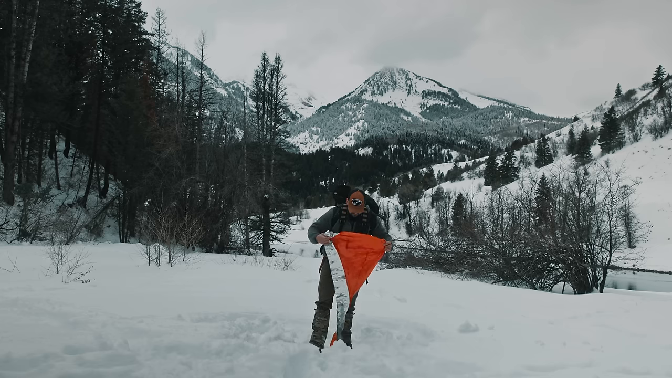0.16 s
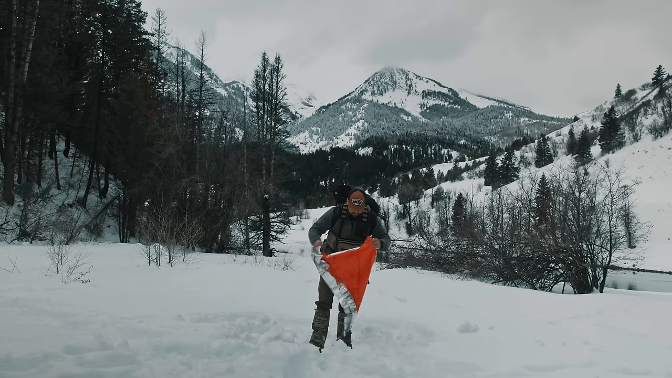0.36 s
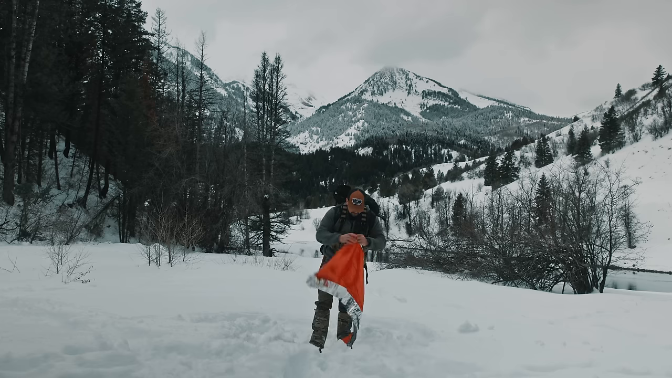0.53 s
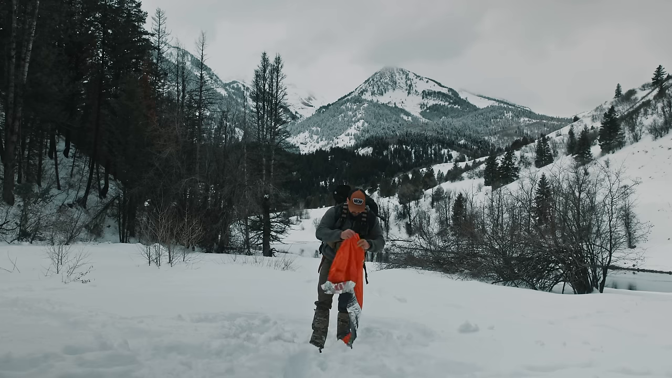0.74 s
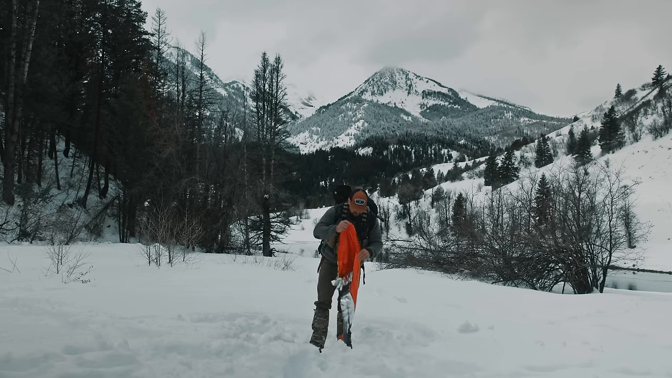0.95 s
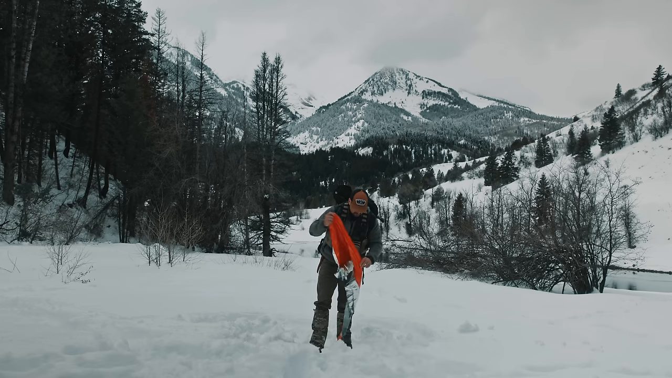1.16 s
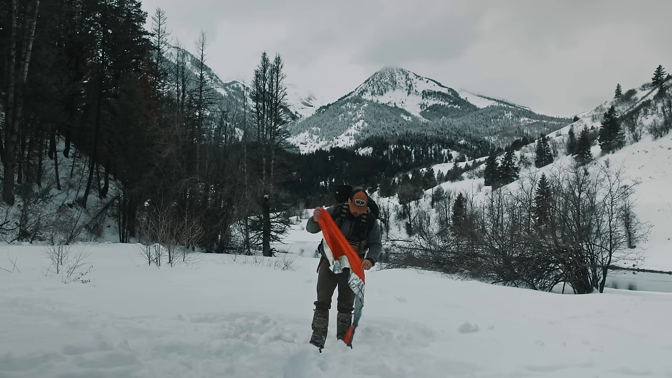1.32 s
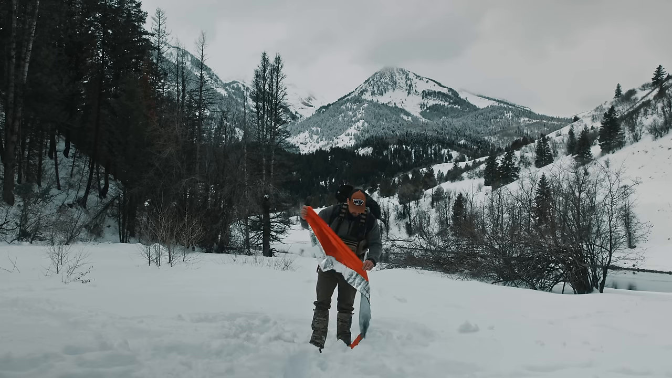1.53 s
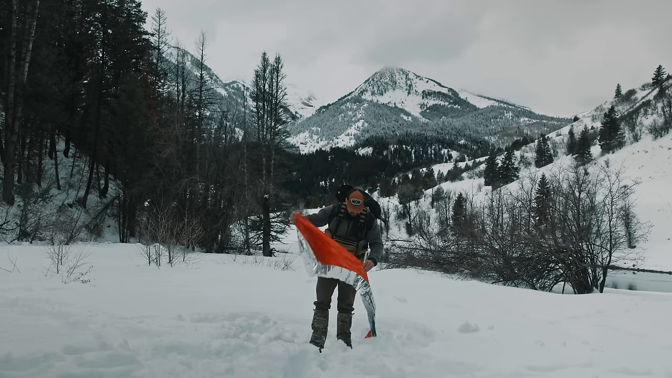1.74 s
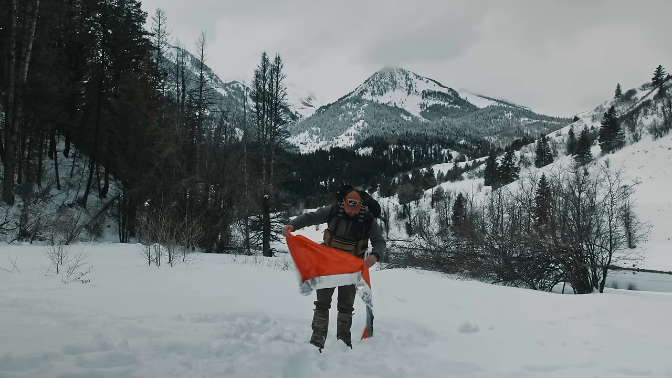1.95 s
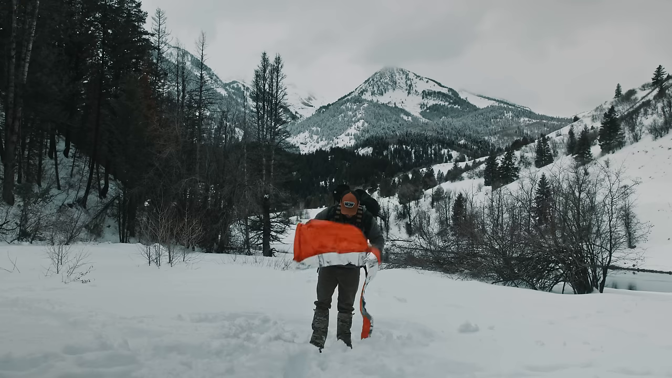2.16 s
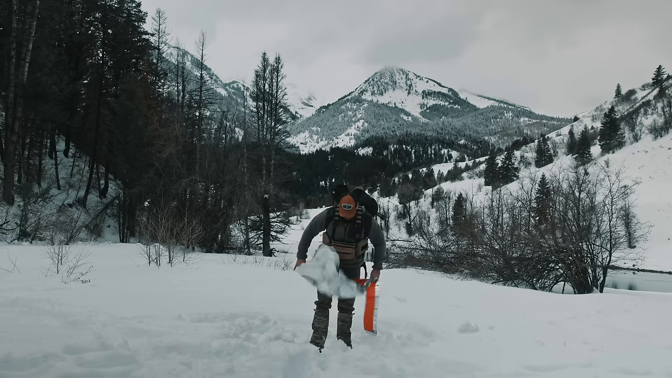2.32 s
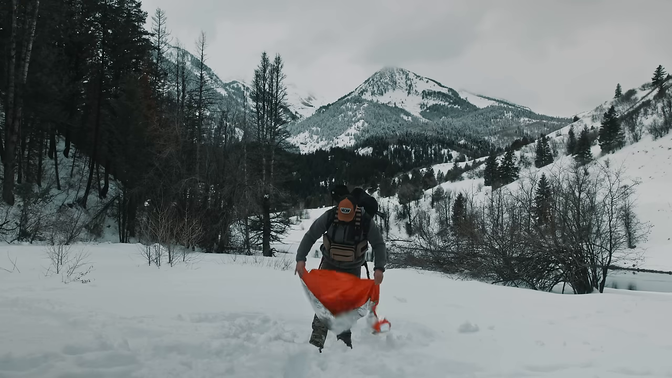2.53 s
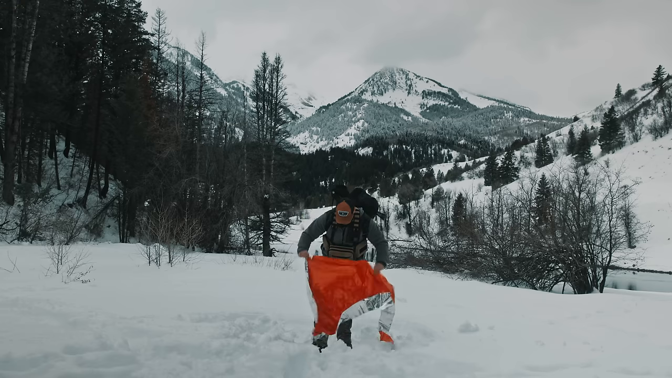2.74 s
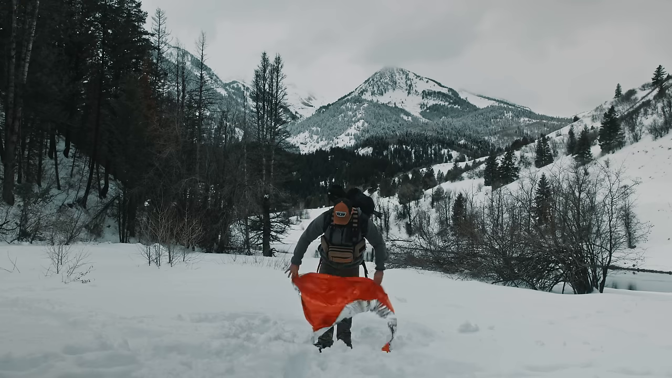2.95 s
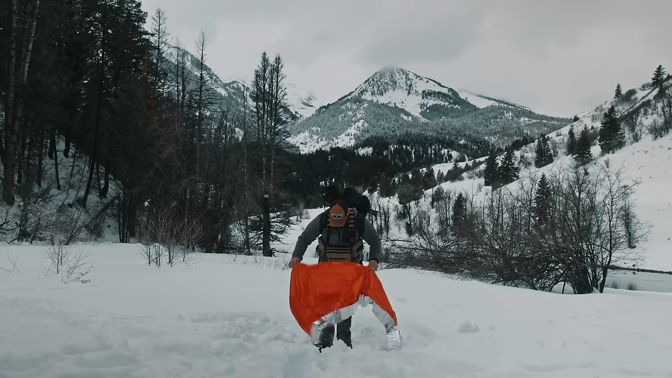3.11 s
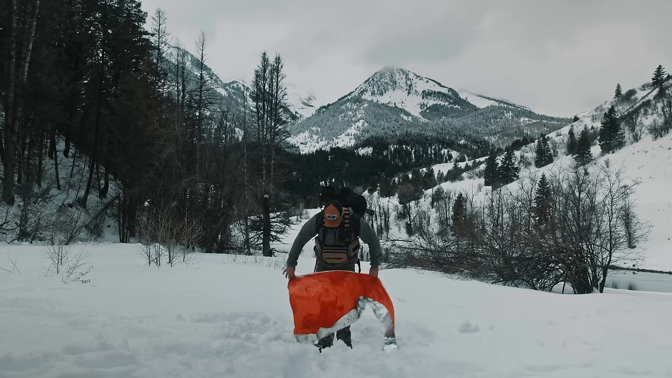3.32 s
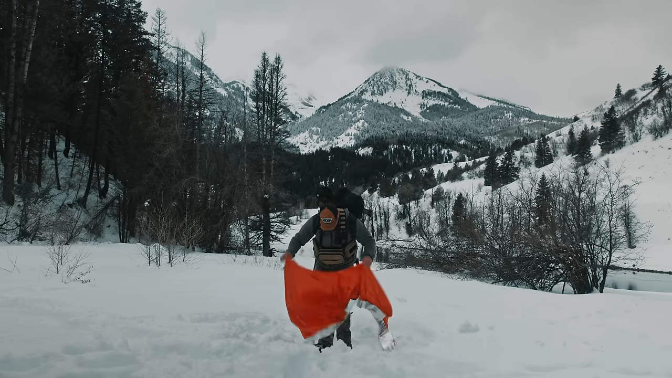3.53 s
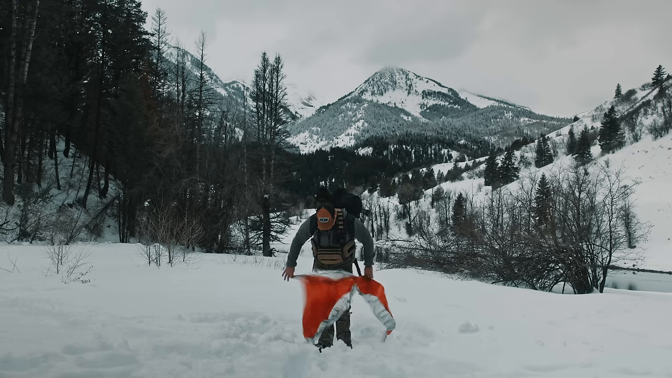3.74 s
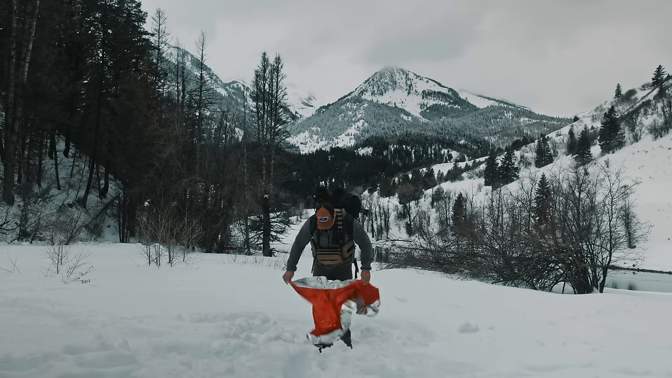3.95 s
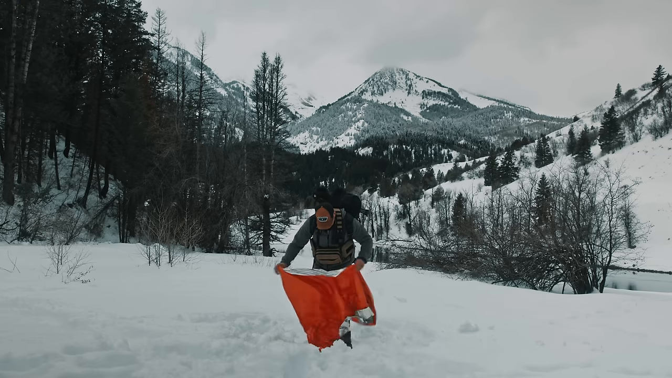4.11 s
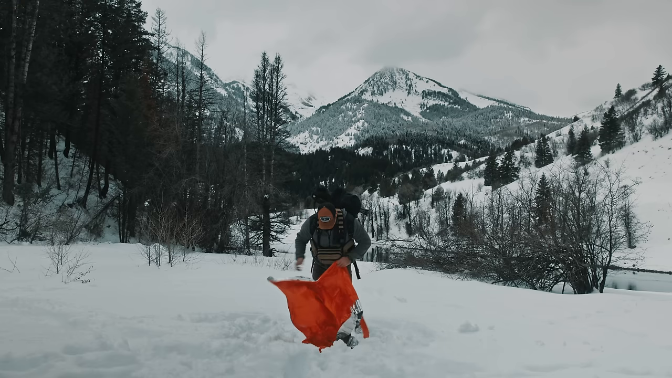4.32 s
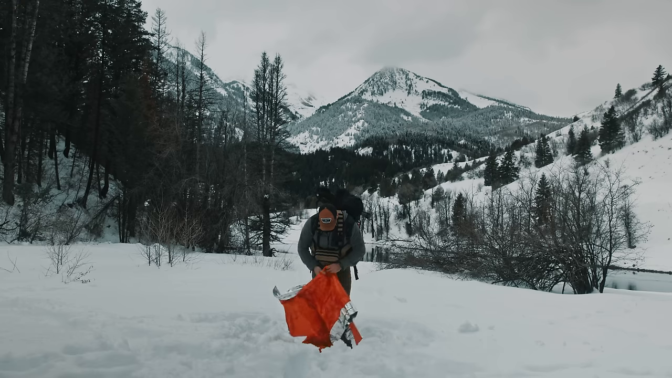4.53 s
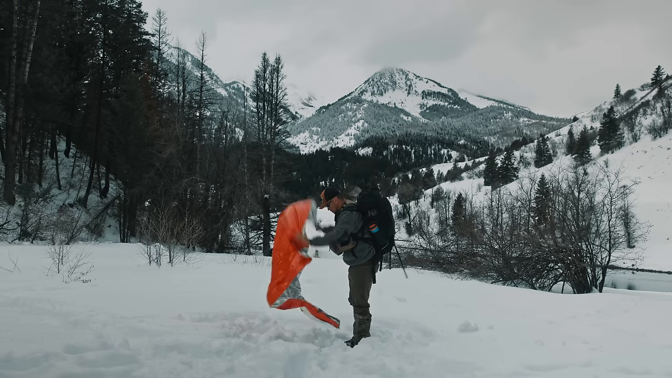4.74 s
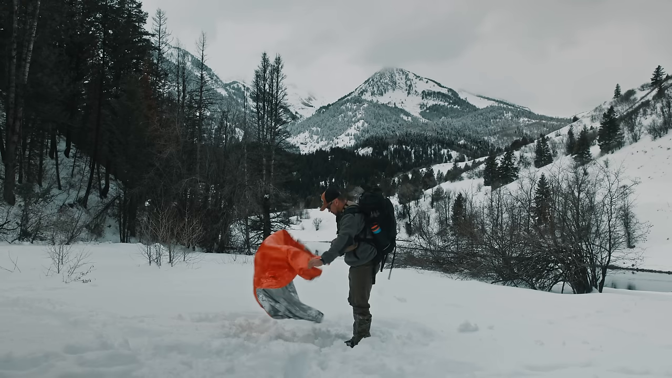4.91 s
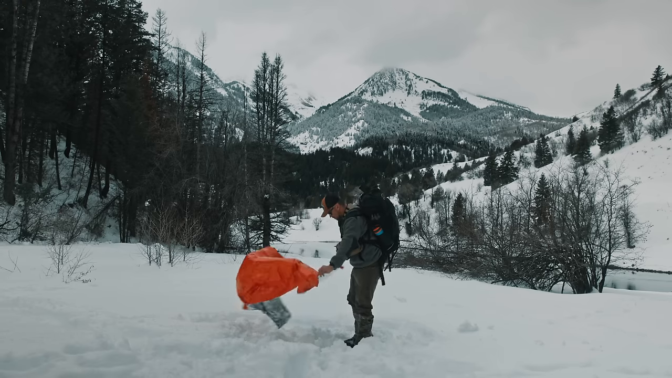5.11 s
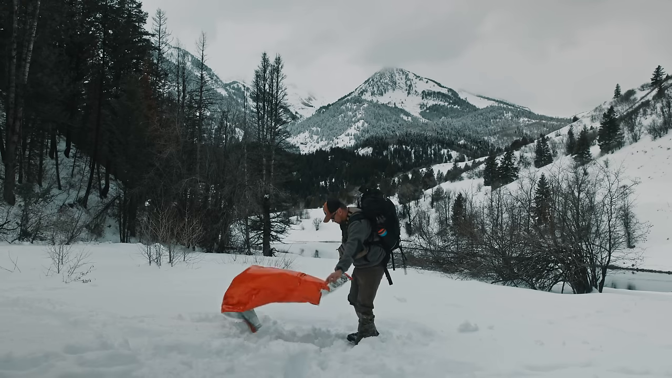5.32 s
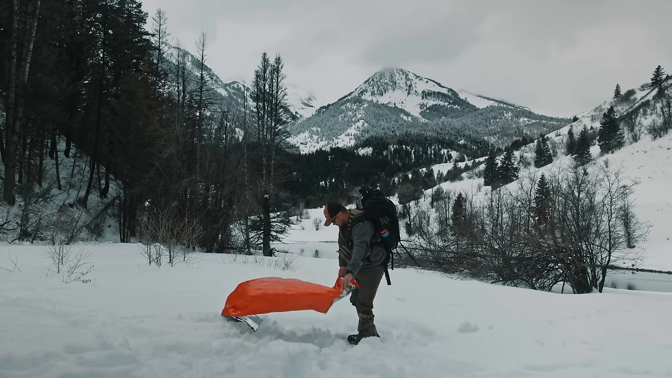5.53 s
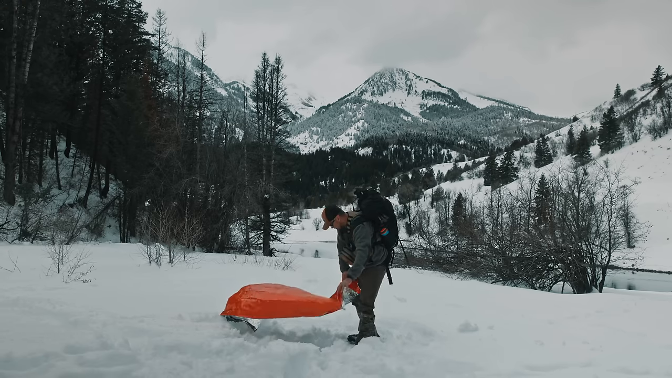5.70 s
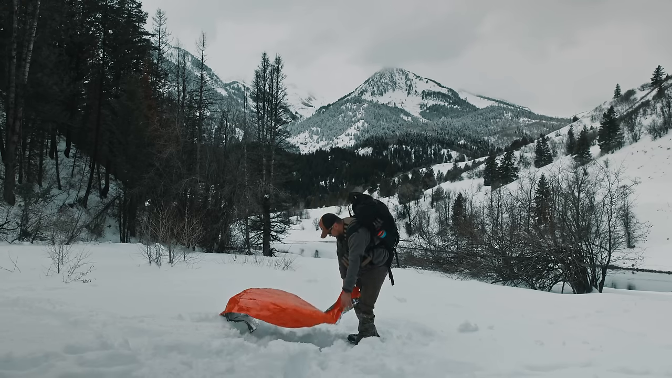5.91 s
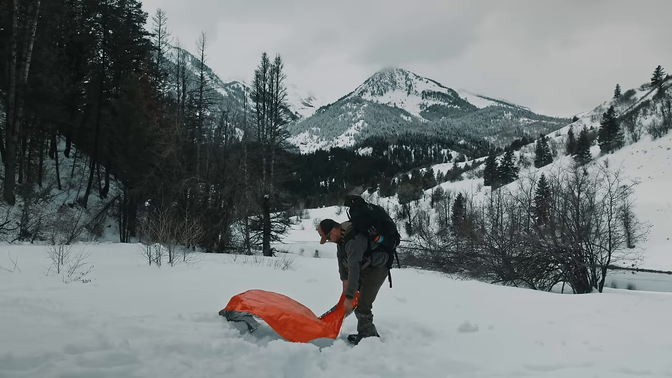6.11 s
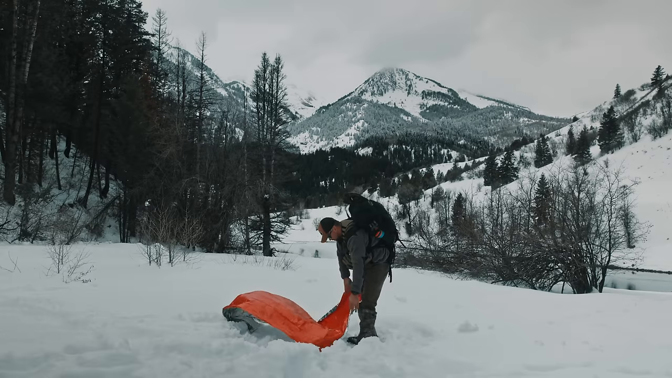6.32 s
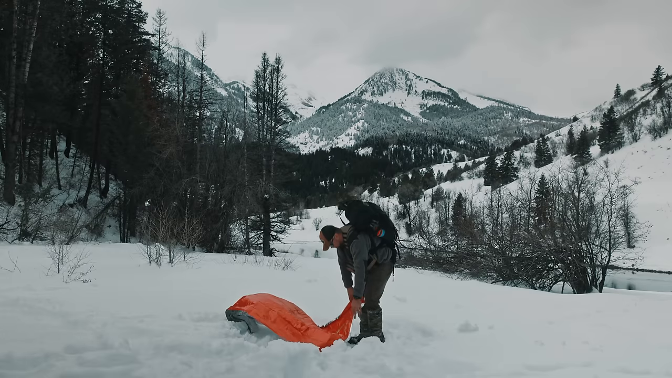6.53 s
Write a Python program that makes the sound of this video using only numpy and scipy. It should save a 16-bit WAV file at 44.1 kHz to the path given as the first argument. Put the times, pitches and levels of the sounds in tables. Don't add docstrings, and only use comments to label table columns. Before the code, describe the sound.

Close up in open, snow-muffled air, a thin stiff plastic sheet is tugged open with bright, dense crackling and single sharp creases popping. A brief lull of faint rustle follows, then hard shakes snap loudly with low whumps of pushed air, irregularly spaced. Finally the sheet slaps the snow lightly and settles with soft crinkles and dull pats. Dry, nearly echo-free, with only a very faint air hush behind.

```python
import sys
import numpy as np
from scipy import signal
from scipy.fft import rfft, irfft
from scipy.io import wavfile
from scipy.ndimage import uniform_filter1d

SR = 44100
rng = np.random.default_rng(int(sys.argv[2]) if len(sys.argv) > 2 else 0)


def store_pcm(level_fs):
    pcm = np.round(np.clip(level_fs, -1, 1) * 32767).astype(np.int16)
    wavfile.write(sys.argv[1], SR, np.atleast_2d(pcm).T)


def magnitude_from_level(level_db):
    exponent = np.asarray(level_db, float) / 20
    return 10 ** exponent


N = 289296

# start_s, effort_db, crease_fineness_db, slack_db
HANDLING = [(0, -47, 0, 4.5), (.14, -38, -6, -12), (.3, -40.5, -2.5, -9), (.61, -39.5, -9, -2),
            (.8, -35.5, -7.5, 2), (1.06, -33, -7, -6), (1.4, -46.5, 5, -2.5), (1.8, -45, -2.5, -7),
            (2.02, -47.5, -2.5, -6), (2.3, -32, -5.5, 4.5), (2.8, -36.5, -6, -5), (3.25, -36, -5, -6.5),
            (3.6, -27.5, -8, -1.5), (4.02, -37, -6, -3), (4.78, -34, -5, -3.5), (5.8, -46, -7.5, -2),
            (5.92, -43.5, -8.5, -0.5), (6.56, -44.5, -6.5, 2)]
# full_s, hold_s, effort_db, slack_db, suddenness (>1 jerks
TUGS = [(.14, 0.043, -36.5, -3, 1.3), (.225, 0.017, -36.5, -12, 0.78), (.335, .005, -39, -16, 1.2),
        (0.374, 0.0087, -24, -1, 0.74), (.46, 0.09, -37, -3.5, 0.73), (.675, .01, -25.5, -2, 0.97),
        (.718, 0.022, -27.5, -5.5, 1.9), (0.818, .005, -37, -3, 1), (0.89, 0.0044, -29.5, -9, 1.6),
        (0.967, 0.091, -31.5, -7, 1.4), (1.5, .1, -50.5, -18, 1.4), (1.826, 0.038, -45, -4, 1.7),
        (2.078, 0.019, -29.5, -5.5, 0.72), (2.18, 0.028, -32.5, -19, 0.44),
        (2.29, 0.0066, -14, -5, 1.05), (2.341, 0.058, -18, -7, 0.9), (2.872, 0.012, -29.5, -23, 0.64),
          (2.925, 0.0053, -15, -5.5, 1.13), (2.99, .01, -33, -4, 2.5), (3.1, 0.014, -37.5, 2, 1.4),
          (3.183, 0.017, -34.5, -0.5, 0.33), (3.391, 0.0058, -17.5, 1, 1.02),
          (3.676, 0.0082, -39, -1, 0.41), (3.799, .005, -15, -6, 0.86), (3.852, 0.028, -19.5, 3, 1.08),
          (4.074, .005, -33.5, 0, 1.1), (4.13, .03, -34.5, 0.5, 0.84), (4.255, .003, -31.5, -18, 1.7),
          (4.406, 0.0046, -29.5, -2, 1), (4.805, 0.035, -23.5, -1, 1.9), (4.844, 0.024, -19.5, -8.5, 3.55),
          (5.004, 0.0084, -25.5, 0, 1.33), (5.168, .005, -36, 0.5, 0.57), (5.403, 0.012, -36, -15, 1.6),
          (5.454, 0.044, -36, -12, 3.3), (5.86, .005, -56, -6, 2.2), (6.094, 0.031, -45.5, -6, 1),
          (6.342, .04, -54, 15, 4.3)]
# middle_s, half_width_s, dip_db
LULLS = [
    (.62, 0.011, -4.5),
    (1.8, 0.027, -5.5),
    (1.94, 0.019, -4.5),
    (2.135, 0.0085, -2),
    (3.72, 0.024, -2),
    (4.285, 0.0072, -6),
    (5.37, 0.026, -2),
    (5.79, 0.072, -4),
    (6.25, 0.069, -1.5),
    (6.43, 0.026, -2),
]
# start_s, rubbing_db
SLIDING = [(0, 5), (.4, 3.5), (.8, 10), (.95, 11), (1.35, 5), (1.7, 9), (1.8, 2), (2.45, -2), (2.85, 1),
           (3.05, -6.5), (4.3, -1), (4.85, 7), (5.6, 3), (5.8, 3), (5.95, 5), (6.4, -2)]
# start_s, pitch_hz, share
STRETCH = [(0, 3100, 0.4), (1.2, 3320, 0.06), (1.28, 6540, 0.8), (1.45, 7200, 0), (1.6, 3260, 0.22),
           (3.0, 3040, 0.1), (3.35, 1040, 0.08), (4.1, 960, 0.28), (4.4, 3020, 0), (5.8, 3100, 0.2),
           (5.9, 4540, 0.3), (6.17, 4500, 0.4), (6.25, 1000, 0.8), (6.56, 800, 1.6)]
# freq_hz, density_db
FILM = [(500, -16), (800, -11.5), (1300, -10), (1800, -10), (2850, -7.5), (3900, -10), (7300, -10.5),
        (10000, -16.5), (15600, -33), (20000, -47)]
# freq_hz, density_db
AIR = [(15, 10.5), (30, -46), (75, -0.5), (200, -2.5), (350, -2.5), (550, -6), (900, -20.5), (2000, -38.5)]
# centre_s, peak_db, pitch_hz
HEAVES = [
    (0.391, -27, 61),
    (0.999, -31, 61),
    (2.35, -12, 78),
    (2.94, -24, 60.3),
    (3.918, -17, 68.5),
    (5.21, -32, 50.4),
    (6.413, -31, 70),
]
# centre_s, peak_db, pitch_hz
FLAPS = [(0.1607, -27, 320), (0.3642, -27, 201), (0.384, -12, 306), (0.6736, -17, 268),
         (0.7174, -13.5, 397), (0.769, -24, 130), (0.893, -20, 235), (1.0743, -31, 190), (1.134, -27, 170),
         (2.0865, -23.5, 216), (2.332, -7, 110), (2.4073, -23, 260), (2.9275, -8.5, 202),
         (2.955, -11.5, 354), (2.977, -20, 272), (3.095, -16.5, 214), (3.3934, -42, 246), (3.414, -18, 250),
         (3.5574, -16, 270), (3.606, -21, 202), (3.6773, -14, 313), (3.8048, -4.5, 290),
         (3.8275, -8.5, 137), (3.8882, -36, 223), (4.085, -23, 262), (4.3959, -19.5, 240),
         (4.8213, -15, 390), (4.8338, -28, 250), (5.008, -20, 210), (5.4764, -27.5, 259)]
# centre_s, peak_db, pitch_hz
LANDINGS = [
    (5.1767, -13, 233),
    (5.5334, -25.5, 212),
    (5.8435, -32, 89.5),
    (5.936, -25.5, 110),
    (6.349, -17, 186),
    (6.368, -20.5, 130),
    (6.3865, -28, 130),
    (6.531, -26, 310),
]
# centre_s, peak_db, facet_hz
BIG_CREASES = [(.028, -19, 5300), (.0628, -21, 3930), (.1384, -16, 2990), (.232, -13.5, 3430),
               (.2982, -17, 2970), (.335, -7, 4430), (.386, -10, 2920), (.3925, -1.5, 2900),
               (.467, -14.5, 3100), (.6765, -19, 2870), (.7183, -9.5, 2170), (.7208, -8.5, 3400),
               (.7617, -13, 3130), (.8164, -8, 2690), (.827, -10.5, 2760), (.8858, -6, 3510),
               (.8893, -6.5, 2550), (.9276, -5, 4730), (.9443, -7.5, 3760), (.9652, -7, 2720),
               (.9789, -16, 4260), (1.016, -5.5, 3500), (1.028, -10.5, 3830), (1.0443, -10, 3800),
               (1.0545, -11, 3140), (1.1349, -16.5, 3920), (1.1617, -16, 4750), (1.193, -13.5, 4660),
               (1.2541, -18, 3530), (1.289, -21, 3780),
               (1.319, -20, 4500), (1.5224, -24, 7170), (1.7458, -25, 3180), (1.826, -21.5, 5730),
           (1.854, -20, 3560), (1.895, -16.5, 6000), (1.913, -17.5, 3510), (2.084, -14, 5200),
           (2.1028, -9.5, 5270), (2.179, -14, 5900), (2.2674, -5, 4100), (2.2837, -10, 3780),
           (2.2907, 4, 3310), (2.3029, -32, 3590), (2.336, -15, 3190), (2.4045, -2.5, 4440),
           (2.5036, -11, 3550), (3.219, -17, 6510), (3.257, -15, 6480), (3.397, -5, 1720),
           (3.806, 5.5, 1660), (3.866, -2.5, 1490), (4.0118, -18, 5940), (4.2154, -16, 3200),
           (4.8072, -2, 3450), (5.0099, -2.5, 4360), (5.4042, -14.5, 4060), (5.5577, -26.5, 3790),
           (5.8477, -23, 2500), (6.2921, -20.5, 2620)]

FILM_RISE_DB_PER_S, FILM_FALL_DB_PER_S = 353, 263
AIR_RISE_DB_PER_S, AIR_FALL_DB_PER_S = 308, 251


def evened(x):
    return x / np.sqrt(np.mean(x ** 2) + 1e-20)


def filtered(x, order, edge_hz, kind="lowpass"):
    return signal.sosfilt(signal.butter(order, edge_hz, kind, fs=SR, output="sos"), x)


def filtered_still(x, order, edge_hz, kind="lowpass"):
    return signal.sosfiltfilt(signal.butter(order, edge_hz, kind, fs=SR, output="sos"), x)


def add(mix, centre_s, sound):
    start = max(round(centre_s * SR) - len(sound) // 2, 0)
    part = mix[start:start + len(sound)]
    part += sound[:len(part)]


def control(rows, column):
    rows = np.array(rows)
    return np.interp(np.arange(N) / SR, rows[:, 0], rows[:, column])


def wander(rate_hz):
    f = np.fft.rfftfreq(N, 1 / SR)
    return evened(irfft(rfft(rng.standard_normal(N)) / (1 + (f / rate_hz) ** 2), N))


def causal(gain_db):
    circle = np.r_[gain_db, gain_db[-2:0:-1]] * np.log(10) / 20
    return np.fft.ifft(np.exp(np.conj(signal.hilbert(circle)))).real[:len(gain_db)]


def grains(spectrum, pitches_hz, per_s, spread_db, clump_db, clump_hz, ring_db, q, wash):
    hz = np.fft.rfftfreq(4096, 1 / SR)
    f, db = np.transpose(spectrum)
    colour_db = np.interp(np.log(hz + 1), np.log(f), db)
    octaves = np.log2((hz + 1) / pitches_hz[:, None])
    rings_db = ring_db / (1 + (q * octaves) ** 2)
    rings_db = rings_db - 10 * np.log10(np.mean(magnitude_from_level(2 * rings_db), 0))

    size = magnitude_from_level(spread_db * np.minimum(rng.exponential(1, N), 4)) * rng.choice([-1., 1.], N)
    clicks = evened(size * (rng.random(N) < per_s / SR))
    facet = rng.integers(0, len(pitches_hz), N)
    clumps = magnitude_from_level(clump_db * wander(clump_hz))

    out = wash * signal.oaconvolve(rng.standard_normal(N) * clumps, causal(colour_db))[:N]
    for k, ring in enumerate(rings_db):
        out += signal.oaconvolve(clicks * clumps * (facet == k), causal(colour_db + ring))[:N]
    return out


def effort(rise_db_per_s, fall_db_per_s, slack):
    step = 32
    t = np.arange(0, N, step) / SR
    handling_db = control(HANDLING, 1) + slack * control(HANDLING, 3)
    power = magnitude_from_level(2 * handling_db)[::step]
    for full_s, hold_s, db, slack_db, sudden in TUGS:
        rise_db = rise_db_per_s * sudden * np.maximum(full_s - t, 0)
        fall_db = fall_db_per_s / sudden * np.maximum(t - full_s - hold_s, 0)
        power = power + magnitude_from_level(2 * (db + slack * slack_db - rise_db - fall_db))
    level_db = 10 * np.log10(power)
    for middle_s, half_s, dip_db in LULLS:
        level_db = level_db + dip_db * np.exp(-((t - middle_s) / half_s) ** 2)
    panel_lag_s = 0.0063
    return np.interp(np.arange(N) / SR - slack * panel_lag_s, t, level_db)


def film_effort():
    return effort(FILM_RISE_DB_PER_S, FILM_FALL_DB_PER_S, slack=0)


def valley_air():
    hush = filtered(rng.standard_normal(N), 2, [90, 2500], "bandpass")
    return magnitude_from_level(-54.5) * evened(hush)


def snow(x):
    t = np.arange(3000) / SR
    turn = 2 * np.pi * 1.313 * np.arange(N) / SR + wander(5.2)
    out = np.zeros(N)
    for share in (np.cos(turn), np.sin(turn)):
        scatter = rng.standard_normal(len(t)) * magnitude_from_level(-60 * t / 0.041) * (t > .0015)
        scatter = signal.lfilter([.4], [1, -.4], scatter)
        out += signal.oaconvolve(x * share, scatter / np.linalg.norm(scatter))[:N]
    return magnitude_from_level(-22.0) * out


def billow():
    air = evened(grains(AIR, np.geomspace(60, 500, 8), per_s=260, spread_db=1.5, clump_db=2.0,
                        clump_hz=25.2, ring_db=11.5, q=0.78, wash=0.91))
    level_db = effort(AIR_RISE_DB_PER_S, AIR_FALL_DB_PER_S, slack=1)
    deep = filtered_still(air, 2, 70)
    deep_gain = magnitude_from_level(0.045 * (level_db + 29))
    return magnitude_from_level(level_db - 0.9) * (air - deep + deep * deep_gain)


def flaps():
    out, t = np.zeros(N), np.arange(-2000, 2000) / SR
    events = FLAPS + LANDINGS + HEAVES
    for (s, db, hz), phase in zip(events, rng.random(len(events))):
        turns = hz * t
        attack = np.exp(-(turns / .35) ** 2)
        decay = np.exp(-(abs(turns) / .85) ** 1.4)
        shape = np.where(turns < 0, attack, decay)
        sagging = turns / (1 + 0.14 * abs(turns))
        add(out, s, magnitude_from_level(db - 3.0) * shape * np.cos(2 * np.pi * (phase + sagging)))
    return filtered(out, 2, 45, "highpass")


def big_creases():
    when, size, pitch = rng.random((170, 3)).T
    s = 6.5 * when ** 1.8
    db = film_effort()[(s * SR).astype(int)] + 9.5 - 2 * np.log(1 - .95 * size)
    facet_hz = 3800 * 2 ** (.35 * (4 * pitch - 2))
    return BIG_CREASES + list(zip(s, db, facet_hz))


def snaps(creases):
    out, t = np.zeros(N), np.arange(-300, 300) / SR
    chance = rng.standard_normal((len(creases), len(t)))
    for (s, db, hz), noise in zip(creases, chance):
        after = np.maximum(t + .0003, 0)
        ring = np.sin(2 * np.pi * hz * after) * np.exp(-after * hz / 0.46) * (1 - np.exp(-after * hz * 1.5))
        crack = noise * np.exp(-after / .0004) * (after > 0)
        snap = np.sign(noise[0]) * ring / abs(ring).max() + 1.4 * crack
        snap = filtered(snap, 2, [.45 * hz, min(2.2 * hz, 12000)], "bandpass")
        snap = filtered(snap, 2, max(1.4 * hz, 6500))
        add(out, s, magnitude_from_level(db - 2.5) * snap / abs(snap).max())
    return out


def aftermath(creases):
    kicks = np.zeros(N)
    for s, db, _ in creases:
        kicks[round(s * SR)] = magnitude_from_level(2 * db)
    decay = np.exp(-np.arange(900) / SR / 0.0025)
    return magnitude_from_level(-38.5) * signal.oaconvolve(kicks, decay)[:N]


def patchy(x, patchy_db):
    z = signal.stft(x, nperseg=256)[2]
    patches = rng.standard_normal(z.T.shape).T
    patches = uniform_filter1d(patches, size=4, axis=0)
    patches = evened(uniform_filter1d(patches, size=24, axis=1))
    return signal.istft(z * magnitude_from_level(patchy_db * patches), nperseg=256)[1][:N]


def resonate(x, hz, width_hz):
    turn = np.exp(2j * np.pi * np.cumsum(hz) / SR)
    r = np.exp(-np.pi * width_hz / SR)
    return 2 * (turn * signal.lfilter([1 - r], [1, -r], x / turn)).real


def crinkle(creases):
    film = grains(FILM, np.geomspace(900, 12000, 16), per_s=3500, spread_db=3.5, clump_db=1.62,
                  clump_hz=130, ring_db=8, q=3.4, wash=1.0)
    film = patchy(film, patchy_db=1.39)
    low = filtered_still(film, 3, 4500)
    below_top = filtered_still(film, 3, 9500)

    level_db = film_effort()
    fine_db = control(HANDLING, 2)
    tug_db = level_db - control(HANDLING, 1)
    rub_db = control(SLIDING, 1)
    fine = magnitude_from_level(fine_db - 0.03) * evened(below_top - low)
    finest_db = -14.5 + fine_db + 0.067 * tug_db + 0.15 * rub_db
    finest = magnitude_from_level(finest_db) * evened(film - below_top)
    sizzle = filtered_still(finest, 3, 12000, "highpass")

    film = evened(low) + fine + finest + (magnitude_from_level(rub_db) - 1) * sizzle
    film = film + control(STRETCH, 2) * resonate(film, control(STRETCH, 1), width_hz=510)
    return film * np.sqrt(magnitude_from_level(2 * (level_db - 1.98)) + aftermath(creases))


def scene():
    creases = big_creases()
    film = crinkle(creases) + snaps(creases)
    return (valley_air() + snow(film) + billow() + flaps() + film)[None]


def low_pass(x):
    return signal.sosfilt(signal.butter(12, 15740, fs=SR, output="sos"), x)


def record(dry):
    dry = filtered(dry, 3, 38, "highpass")
    limited = .7 * np.tanh(dry / .7)
    edge = signal.firwin(511, 15700, window=("kaiser", 9), fs=SR)
    mix = signal.oaconvolve(limited, edge[None], "same")
    return low_pass(mix)


dry = scene()
out = record(dry)
store_pcm(out)
```